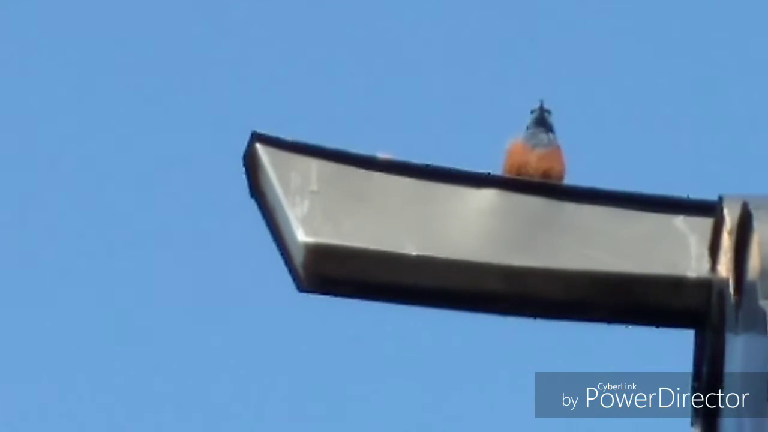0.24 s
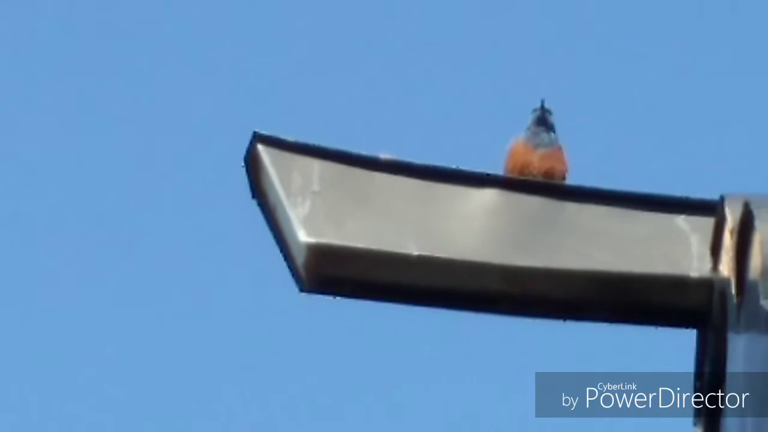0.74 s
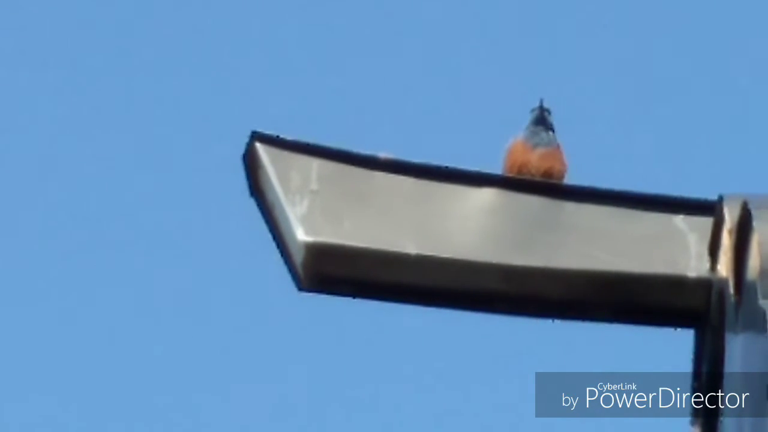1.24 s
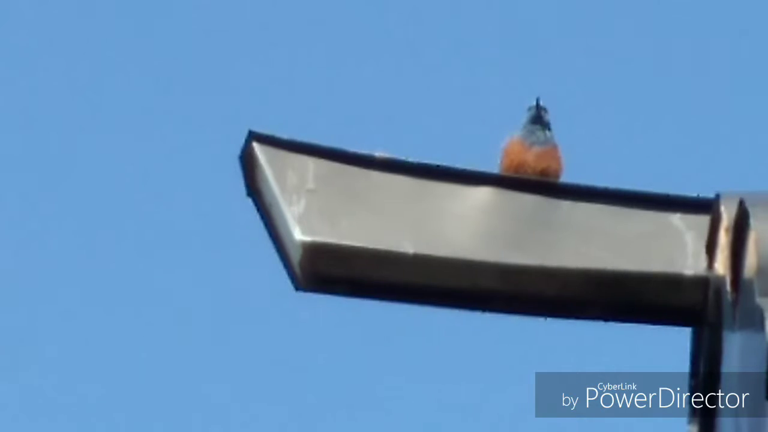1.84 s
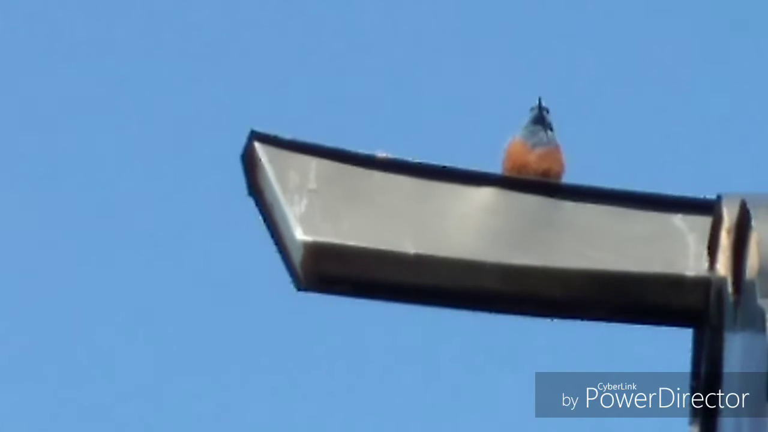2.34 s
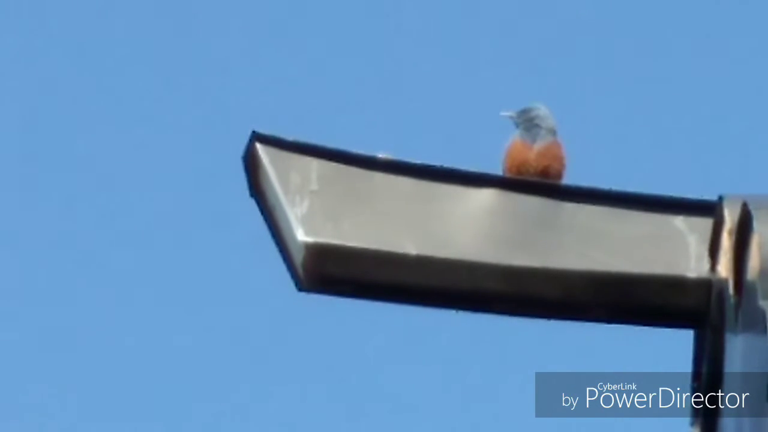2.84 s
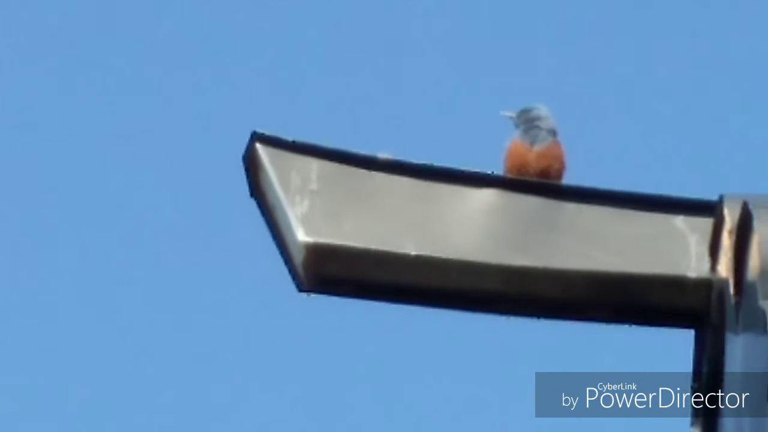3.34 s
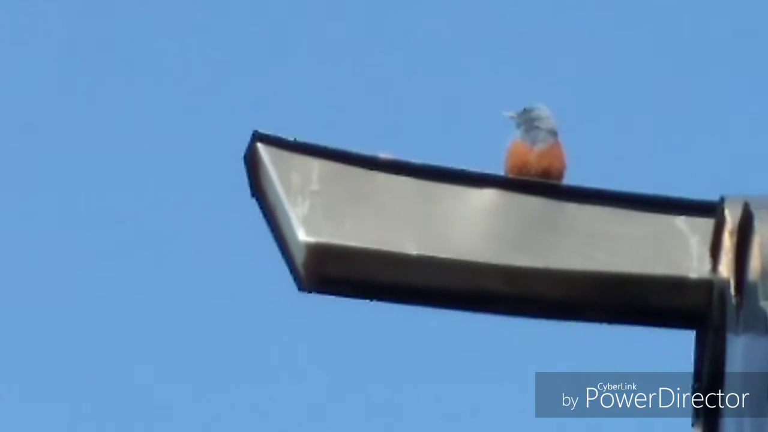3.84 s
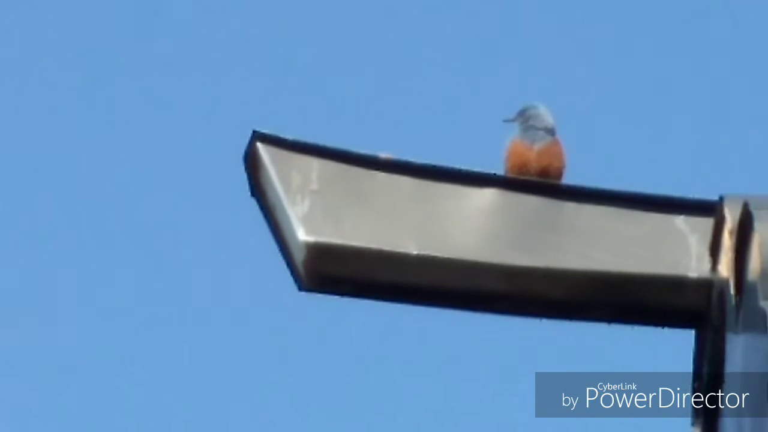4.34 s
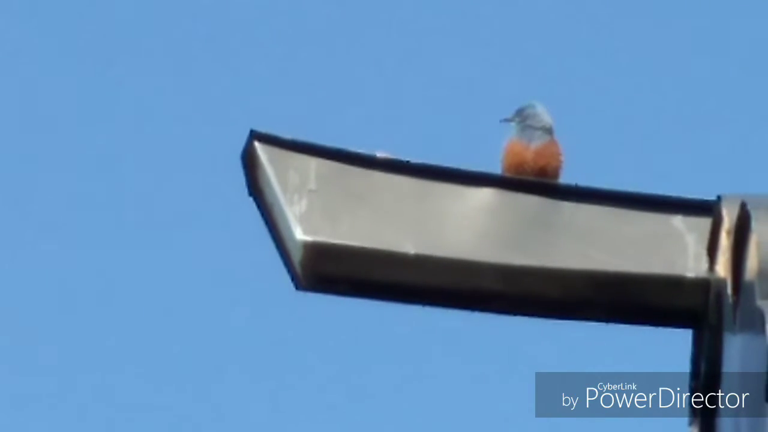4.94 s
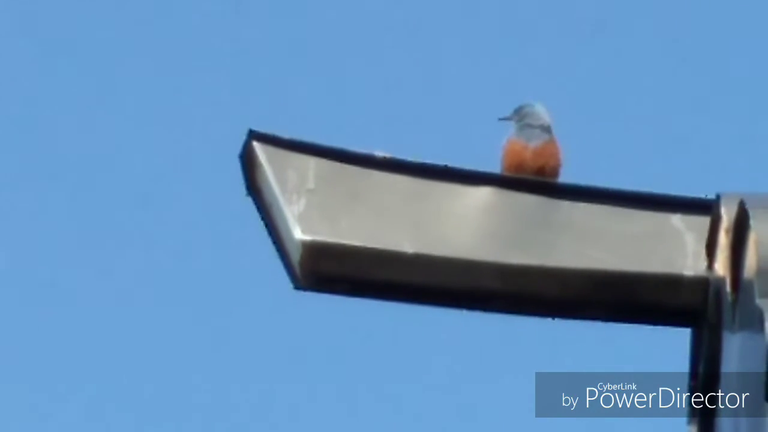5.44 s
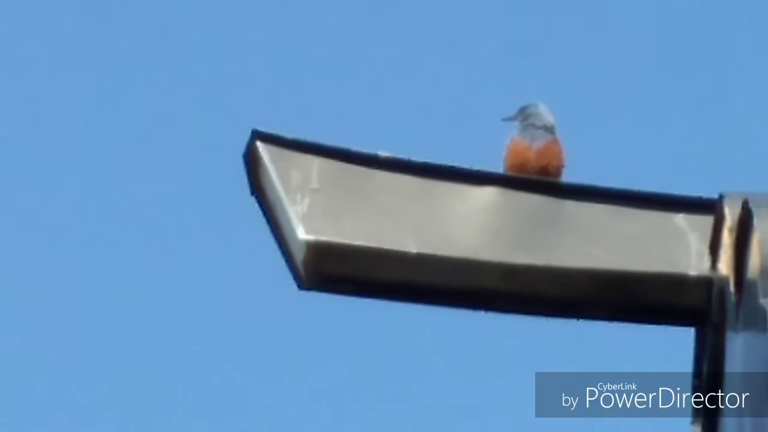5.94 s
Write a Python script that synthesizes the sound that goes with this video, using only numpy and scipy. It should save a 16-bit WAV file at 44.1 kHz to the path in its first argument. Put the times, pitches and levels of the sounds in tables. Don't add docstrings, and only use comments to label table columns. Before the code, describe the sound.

Outdoors among buildings, short high warbles recur five times, growing clearer, with one lower whistled trill midway above a dull town rumble.

```python
import sys
import numpy as np
from scipy import signal
from scipy.fft import rfft, irfft
from scipy.io import wavfile
from scipy.ndimage import uniform_filter1d

SR = 44100
rng = np.random.default_rng(int(sys.argv[2]) if len(sys.argv) > 2 else 0)


def nominal_scale(level):
    x = np.asarray(level, float) / 20
    return 10 ** x


def transcribe(u):
    v = np.clip(np.atleast_2d(u).T, -1, 1)
    q = np.round(v * 32767).astype(np.int16)
    wavfile.write(sys.argv[1], SR, q)


N = 273130
TIME = np.arange(N) / SR


def level(x, db):
    return x * nominal_scale(db) / np.sqrt(np.mean(x ** 2))


def colour(x, points):
    hz, db = np.transpose(points)
    log_hz = np.log(np.arange(N // 2 + 1) * SR / N + 0.00089)
    gain = nominal_scale(np.interp(log_hz, np.log(hz), db))
    return irfft(rfft(x) * gain, N)


def walk(rate_hz):
    hold = int(SR / rate_hz)
    steps = np.repeat(rng.standard_normal(N // hold + 1), hold)
    slewed = uniform_filter1d(uniform_filter1d(steps, hold), hold)
    return 1.3 * slewed[:N]


def waver(hz, width_hz, db):
    sliver = [(hz - width_hz, -30), (hz, 0), (hz + width_hz, -30)]
    return level(colour(rng.standard_normal(N), sliver), db)


def sing(out, start_s, hz, db, edge_s):
    overtone_db = -32.5
    t = np.arange(len(hz)) / SR
    nearest_end = np.minimum(t, t[-1] - t)
    gate = np.sin(np.pi / 2 * np.clip(nearest_end / edge_s, 0, 1)) ** 2
    phase = 2 * np.pi * np.cumsum(hz) / SR
    tone = np.sin(phase) + nominal_scale(overtone_db) * np.sin(2 * phase)
    first = int(start_s * SR)
    out[first:first + len(hz)] += np.sqrt(2) * nominal_scale(db) * gate * tone


# (time from flick [s], pitch [Hz], effort [dB])
WARBLE_SHAPE = [(-.199, 5150, -39), (-.192, 6300, -7), (-.185, 5400, -4), (-.178, 6500, 5),
                (-.174, 6250, 0), (-.164, 6750, 6), (-.15, 5850, -7), (-.138, 5200, 0), (-.125, 5600, 1),
                (-.117, 6250, -2), (-.107, 5350, 3), (-.088, 5170, -1.5), (-.075, 5350, -8),
                (-.067, 5300, -11), (-.058, 4480, -4.5), (-.037, 4250, -8), (-.015, 4550, -6.5),
                (-.007, 4950, -6), (0, 5950, -3), (.008, 5150, -11), (.02, 4900, -5), (0.036, 4660, -5),
                (.095, 4090, 7.5), (.108, 3720, -13)]
# (time of flick [s], stretch before flick [ratio], song after flick [s])
WARBLE_TIMES = [
    (.299, 0.82, .079),
    (2.162, 1, .098),
    (2.933, 0.86, .091),
    (4.015, 1.01, 0.16),
    (5.179, 1.01, 0.1),
]
WARBLE_STAGES = [-.18, -.14, -.09, -.04, .015, .09]
WARBLE_TUNING = [(0.959, .98, 0.9, 0.96, .94, 1.01), (.96, 1.001, 0.97, 0.93, 0.98, 0.97),
                 (1.001, 1.001, 0.88, 0.96, .99, .98), (1.001, 1.02, .99, .99, 1.001, 1.01),
                 (1.001, 1.01, 1.001, 1.001, 1.01, 0.994)]
# (level [dB], ..)
WARBLE_LOUDNESS = [(-90, -61, -53, -52, -53, -72), (-80, -56, -57, -52, -45.5, -64),
                   (-60, -56, -61, -50, -48, -70), (-51, -46, -49, -44.5, -45.5, -59),
                   (-48.5, -48, -48, -42.5, -40.5, -56.5)]


def warbler():
    out = np.zeros(N)
    s, hz, effort_db = np.transpose(WARBLE_SHAPE)
    for (flick_s, stretch, after_s), tuning, loud_db in zip(WARBLE_TIMES, WARBLE_TUNING, WARBLE_LOUDNESS):
        t = np.arange(s[0] * stretch, after_s, 1 / SR)
        shape_t = np.where(t < 0, t / stretch, t)
        pitch = uniform_filter1d(np.interp(shape_t, s, hz), size=150)
        pitch = pitch * np.interp(shape_t, WARBLE_STAGES, tuning)
        db = np.interp(shape_t, s, effort_db) + np.interp(shape_t, WARBLE_STAGES, loud_db)
        sing(out, flick_s + t[0], pitch, db, edge_s=0.0045)
    return out * nominal_scale(0.63 * walk(60))


# (time [s], pitch [Hz], level [dB])
THRUSH_NOTES = [
    [(2.885, 2750, -69), (2.903, 2760, -61), (2.931, 2730, -63), (2.935, 2771, -71)],
    [(3.035, 2800, -71), (3.045, 2730, -53), (3.055, 2550, -56), (3.105, 2300, -63)],
    [(3.215, 3010, -70.5), (3.235, 3034, -58), (3.257, 3020, -54.5), (3.272, 3028, -51)],
    [(3.272, 2980, -64), (3.31, 3050, -48), (3.323, 3029, -55)],
    [(3.683, 2450, -54.5), (3.697, 2220, -54), (3.707, 2194, -54), (3.714, 2220, -60)],
    [(3.76, 2890, -68), (3.782, 3050, -55.5), (3.802, 3070, -45)],
    [(3.802, 3170, -49), (3.81, 3170, -43), (3.838, 3200, -41), (3.852, 3210, -60)],
    [(3.852, 3170, -45), (3.872, 3196, -43), (3.879, 3180, -52)],
]
# (time [s], peak level [dB], start pitch [Hz], end pitch [Hz], length [s])
TRILL_CHIRPS = [(3.323, -42, 2980, 2890, 0.018), (3.342, -54, 3030, 2950, .014),
                (3.356, -44, 2980, 2720, .014), (3.374, -42.5, 3036, 2560, 0.017),
                (3.401, -41, 3000, 2550, .015), (3.427, -41.5, 2974, 2554, .018),
                (3.453, -39.5, 2970, 2560, 0.016), (3.482, -43, 3010, 2620, 0.014),
                (3.502, -41.5, 3100, 2660, .012), (3.525, -43, 3180, 2640, 0.016),
                (3.549, -43, 3070, 2620, 0.014), (3.577, -44, 3050, 2670, 0.014),
                (3.601, -43, 3200, 2600, .013), (3.625, -44, 3250, 2660, .014),
                (3.648, -41, 2890, 2480, 0.018), (3.666, -42, 2590, 2470, 0.011)]


def thrush():
    out = np.zeros(N)
    for note in THRUSH_NOTES:
        s, hz, db = np.transpose(note)
        t = np.arange(s[0], s[-1], 1 / SR)
        pitch = uniform_filter1d(np.interp(t, s, hz), size=200)
        sing(out, s[0], pitch, np.interp(t, s, db), edge_s=0.0032)
    for s, peak_db, start_hz, end_hz, length_s in TRILL_CHIRPS:
        fall = np.linspace(start_hz, end_hz, int(length_s * SR))
        sing(out, s, fall, peak_db - 6, edge_s=0.0022)
    return out


# (delay [s], level [dB])
WALL_ECHOES = [
    (.009, -8.5),
    (.022, -12),
    (0.038, -18),
    (.052, -23.5),
]


def walls(x, db):
    yard_db, yard_t60_s = -15.5, .3
    t = np.arange(SR // 2) / SR
    tail = rng.standard_normal(len(t)) * nominal_scale(-60 * t / yard_t60_s)
    tail *= np.clip(t / 0.01, 0, 1)
    answer = tail * nominal_scale(yard_db) / np.sqrt(np.sum(tail ** 2))
    for delay_s, echo_db in WALL_ECHOES:
        answer[int(delay_s * SR)] += nominal_scale(echo_db)
    return x + nominal_scale(db) * signal.fftconvolve(x, answer)[:N]


# (time [s], pressure level [dB])
GUSTS = [(0.0, -39), (0.14, -37), (0.24, -41), (0.38, -37), (0.47, -39), (0.6, -34), (0.79, -39.5),
         (0.91, -37), (1.03, -36), (1.12, -35.5), (1.4, -33.5), (1.55, -37.5), (1.98, -38.5), (2.1, -33.5),
         (2.29, -37.5), (2.39, -40), (2.48, -31.5), (2.72, -40), (2.81, -35.5), (3.26, -38), (3.43, -31.5),
         (4.21, -40), (4.41, -31.5), (4.59, -40.5), (4.71, -35), (4.93, -34.5), (5.0, -34), (5.27, -35.5),
         (5.36, -31.5), (5.6, -37.5), (5.84, -38), (5.98, -40), (6.12, -35), (6.19, -39)]
# (frequency [Hz], level [dB per Hz])
WIND_SPECTRUM = [(1, -4), (4, 9), (8, -0.5), (13, 0), (20, -12), (26, -23.5), (40, -55)]


def wind():
    push = colour(rng.standard_normal(N), WIND_SPECTRUM)
    power = uniform_filter1d(uniform_filter1d(push ** 2, size=9000), size=9000)
    even = push / np.sqrt(power)
    gust_db = uniform_filter1d(np.interp(TIME, *np.transpose(GUSTS)), size=3000)
    return even * nominal_scale(gust_db)


# (frequency [Hz], level [dB per Hz])
TRAFFIC_SPECTRUM = [(28, 8), (50, 6), (80, 1.5), (125, -6), (140, -9), (230, -8), (330, -13.5),
                    (450, -15.5), (600, -19.5), (950, -16.5), (2000, -30.5), (2450, -23), (3000, -43),
                    (4200, -39)]
# (frequency [Hz], width [Hz], level [dB])
HUM_TONES = [(152, 12, -71.5), (202.6, 26, -75), (250, 19, -66), (300.3, 20, -69.5), (453, 8, -70.5),
             (482, 6.2, -76)]
# (time [s], level [dB])
HUM_SWELLS = [(0.0, -65), (0.15, -61.5), (0.34, -57.5), (0.41, -62.5), (0.88, -57.5), (0.93, -64),
              (1.14, -57), (1.31, -61), (1.33, -60), (1.71, -62.5), (1.78, -60.5), (1.95, -61), (6.19, -65)]


def town():
    swell = nominal_scale(0.34 * walk(1.4) + .3 * walk(13))
    traffic = colour(rng.standard_normal(N) * swell, [(13, -15.5)] + TRAFFIC_SPECTRUM)
    drone = waver(42.2, width_hz=12, db=-57)
    s, swell_db = np.transpose(HUM_SWELLS)
    hum_db = 1.6 * np.interp(TIME, s, swell_db - swell_db.mean())
    hum = sum(waver(*tone) for tone in HUM_TONES) * nominal_scale(hum_db)
    return level(traffic, -51) + drone + hum


def scene():
    high_bird = walls(warbler(), db=-4)
    low_bird = walls(thrush(), db=0)
    return (high_bird + low_bird + wind() + town())[None]


def top_cut(x):
    return signal.sosfilt(signal.butter(12, 15500, fs=SR, output="sos"), x)


# (frequency [Hz], level [dB])
MIC_RESPONSE = [(4000, 1), (4600, -3.5), (5200, -8), (5800, -17), (6400, -25), (7000, -25), (8000, -62),
                (10000, -70)]
# (frequency [Hz], level [dB per Hz])
HISS_SPECTRUM = [(3000, -3), (7000, 0), (10000, -6.5), (12700, -11), (13100, -13), (15300, -19),
                 (15700, -20)]
# (frequency [Hz], level [dB])
WHINES = [(6788, -104), (7795, -109), (8710, -109), (11698, -111)]


def record(dry):
    hiss = level(colour(rng.standard_normal(N), HISS_SPECTRUM), -86)
    whine = sum(np.sqrt(2) * nominal_scale(db) * np.sin(2 * np.pi * hz * TIME) for hz, db in WHINES)
    heard = colour(dry[0], MIC_RESPONSE) + hiss + whine
    return top_cut(heard[None])


dry = scene()
out = record(dry)
transcribe(out)
```